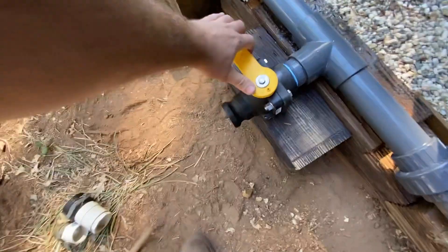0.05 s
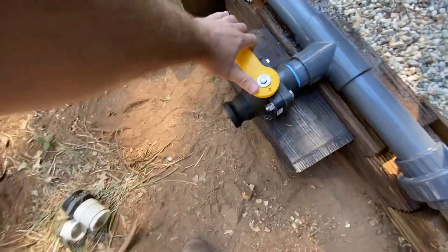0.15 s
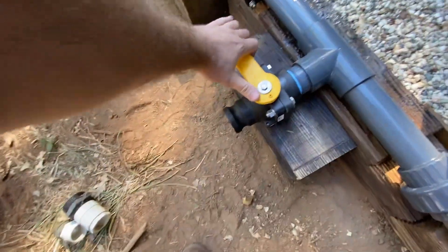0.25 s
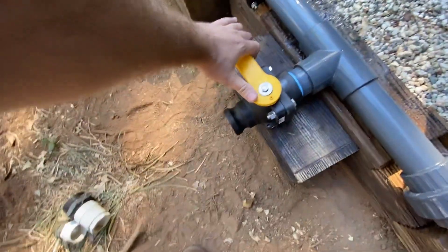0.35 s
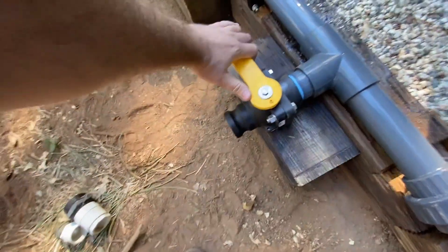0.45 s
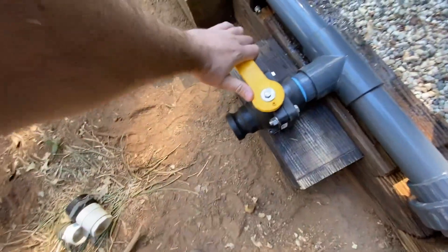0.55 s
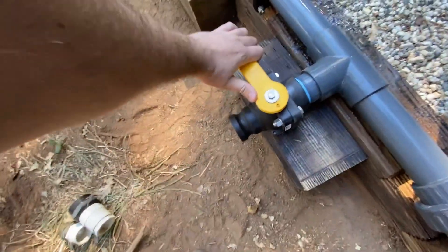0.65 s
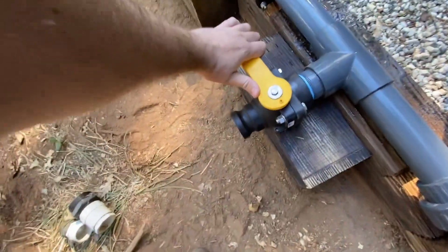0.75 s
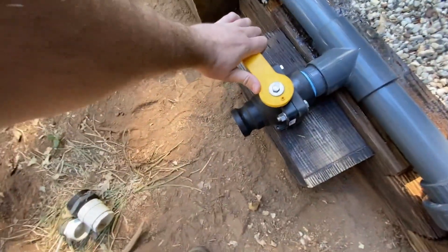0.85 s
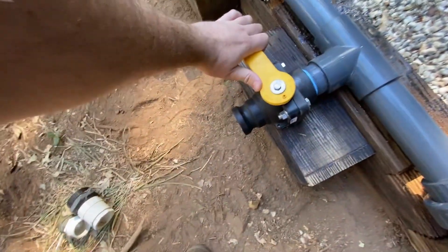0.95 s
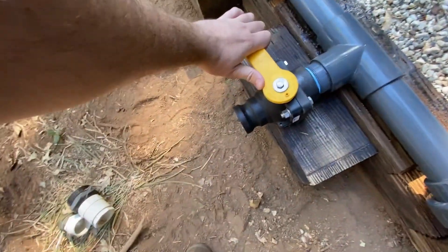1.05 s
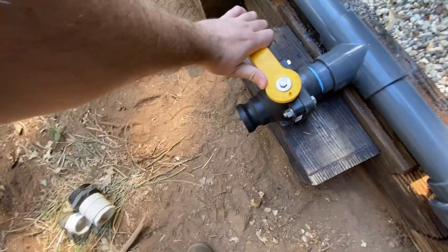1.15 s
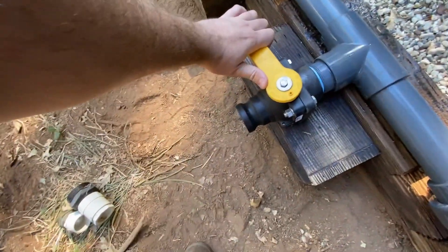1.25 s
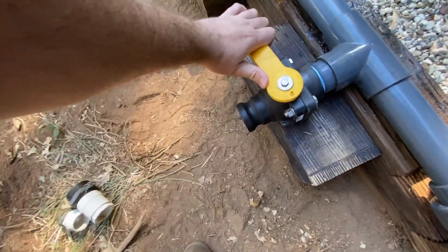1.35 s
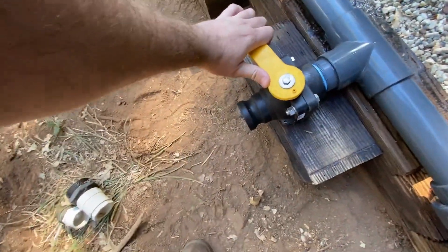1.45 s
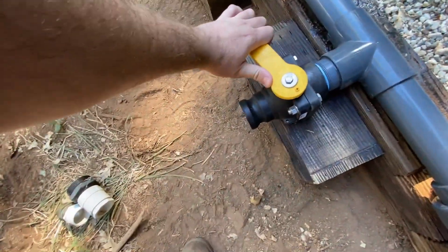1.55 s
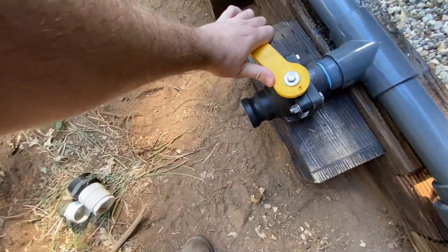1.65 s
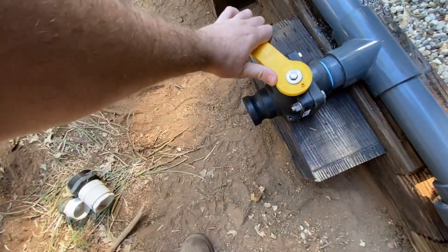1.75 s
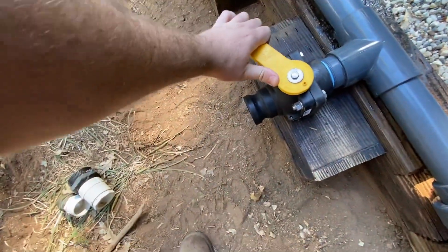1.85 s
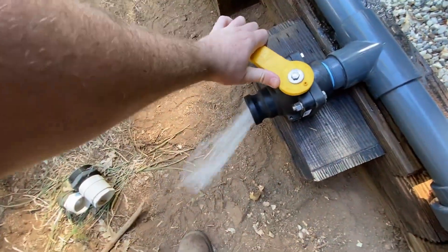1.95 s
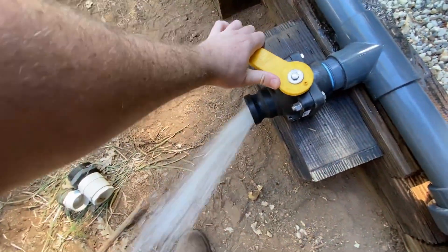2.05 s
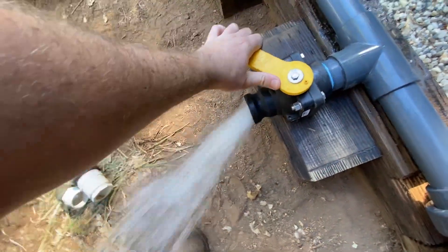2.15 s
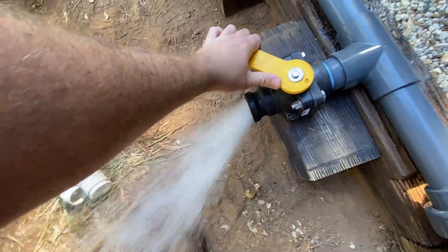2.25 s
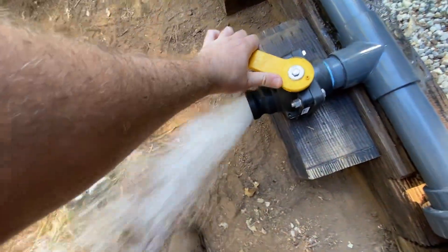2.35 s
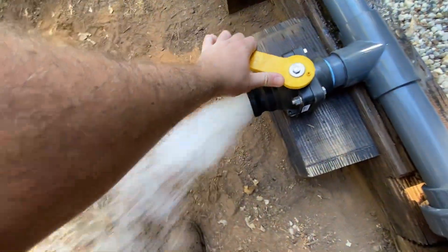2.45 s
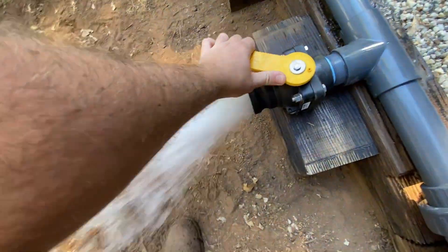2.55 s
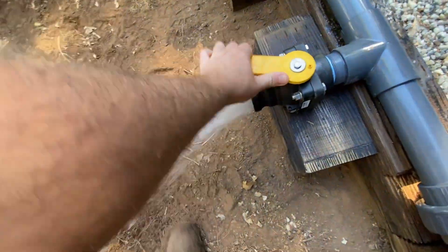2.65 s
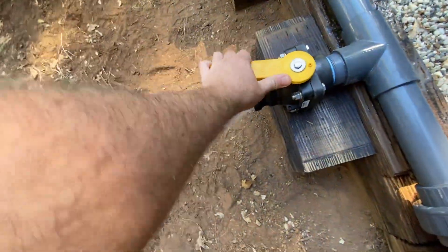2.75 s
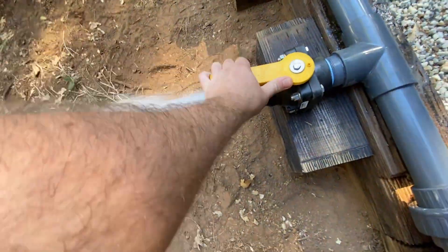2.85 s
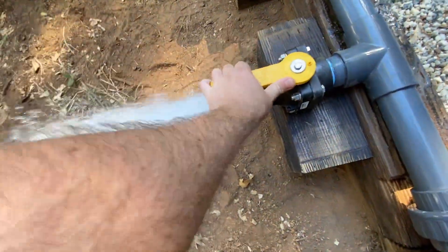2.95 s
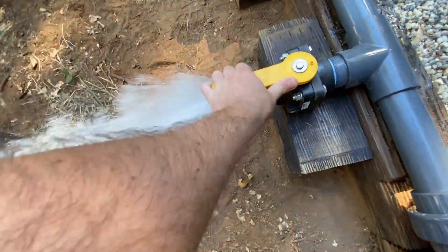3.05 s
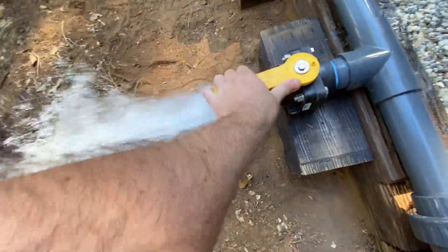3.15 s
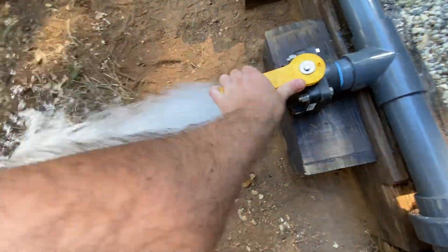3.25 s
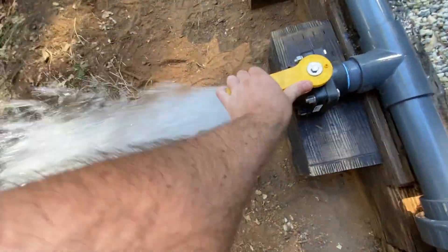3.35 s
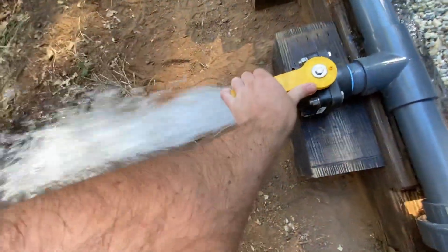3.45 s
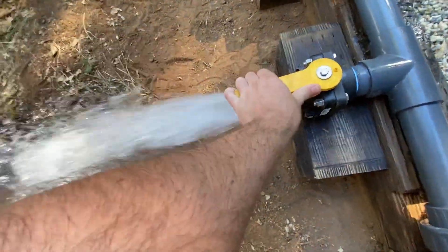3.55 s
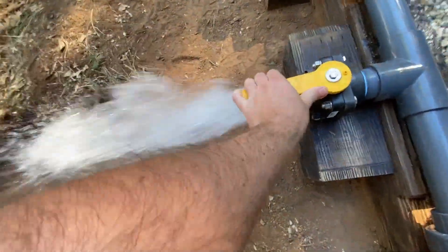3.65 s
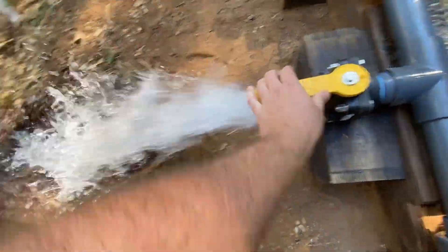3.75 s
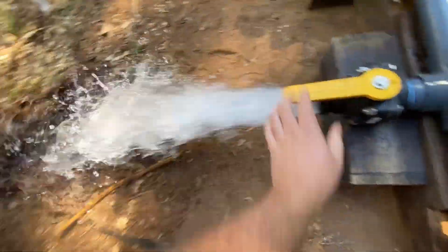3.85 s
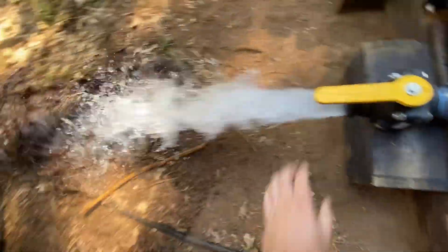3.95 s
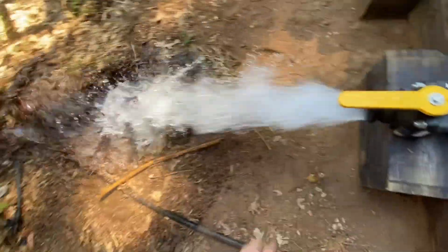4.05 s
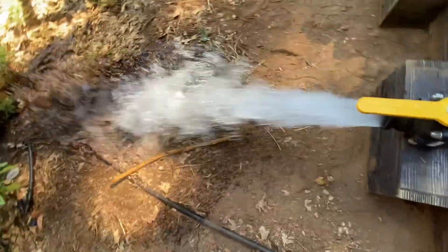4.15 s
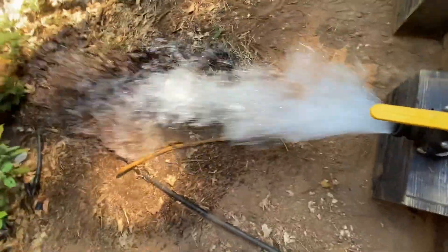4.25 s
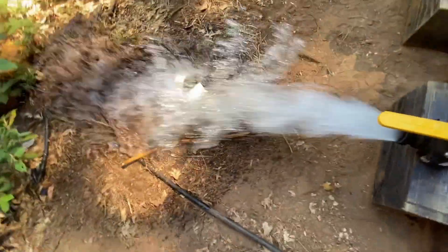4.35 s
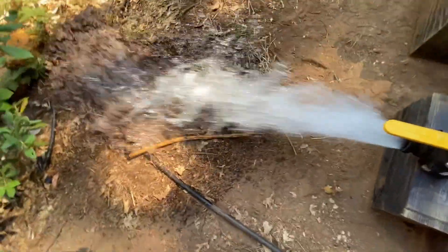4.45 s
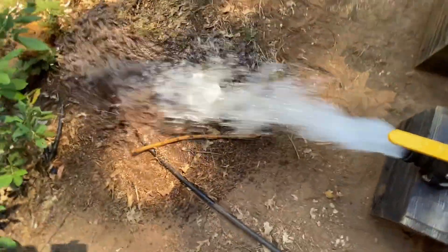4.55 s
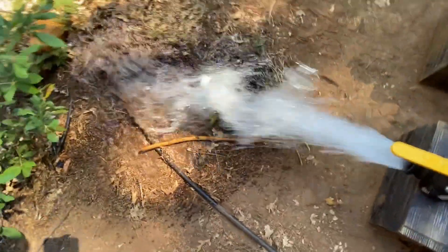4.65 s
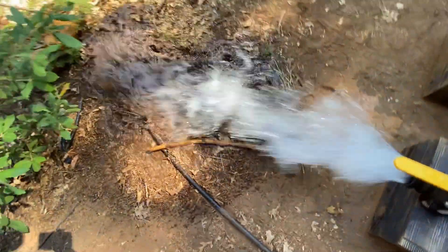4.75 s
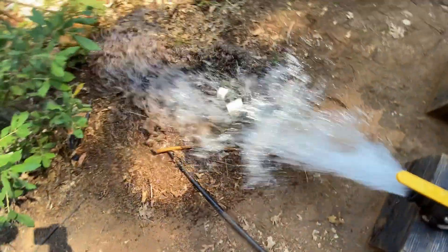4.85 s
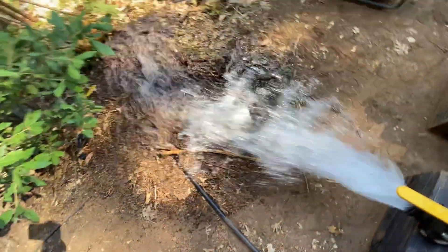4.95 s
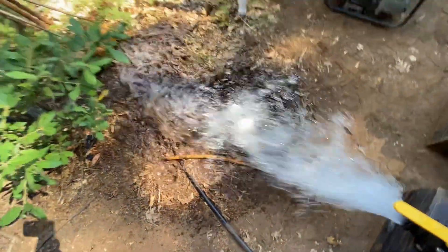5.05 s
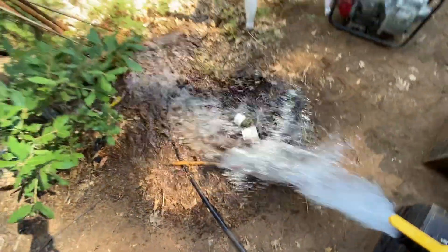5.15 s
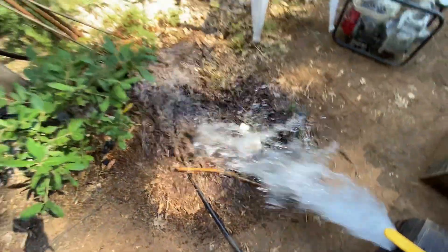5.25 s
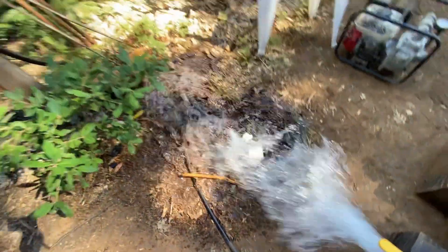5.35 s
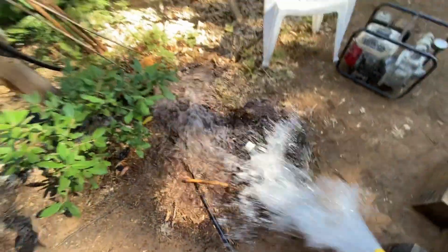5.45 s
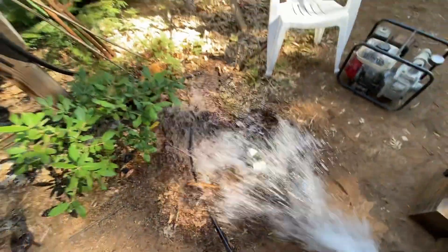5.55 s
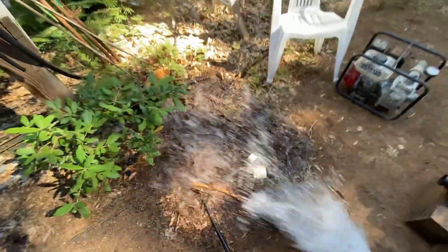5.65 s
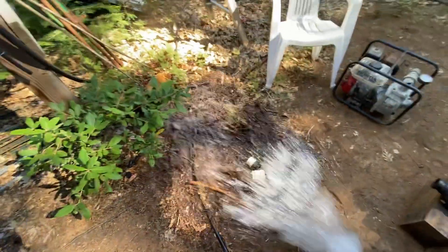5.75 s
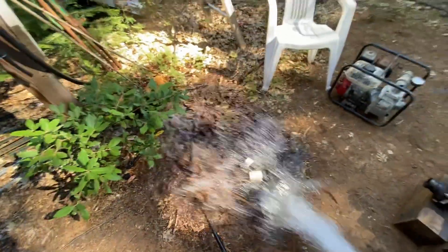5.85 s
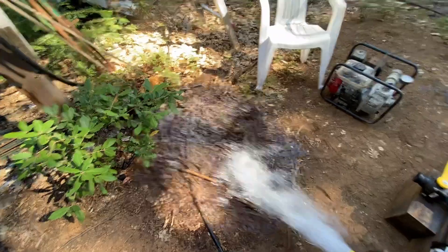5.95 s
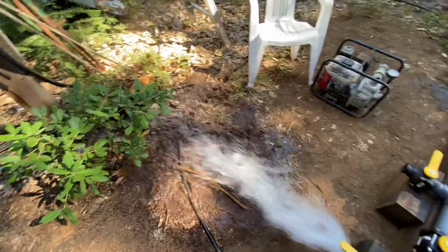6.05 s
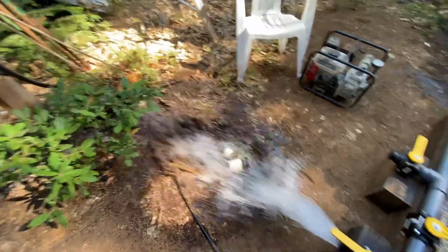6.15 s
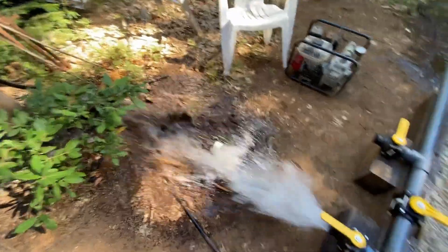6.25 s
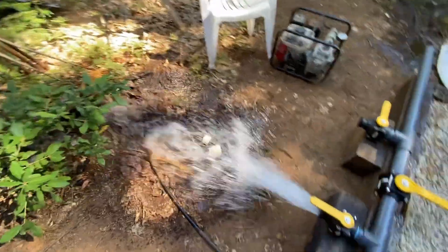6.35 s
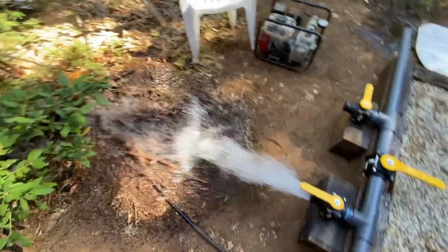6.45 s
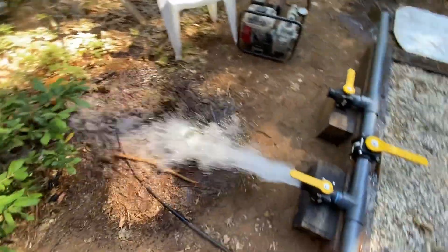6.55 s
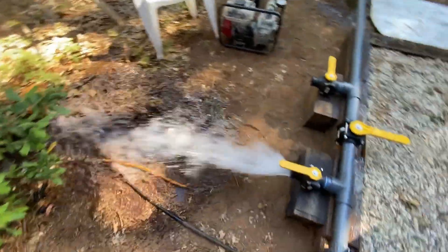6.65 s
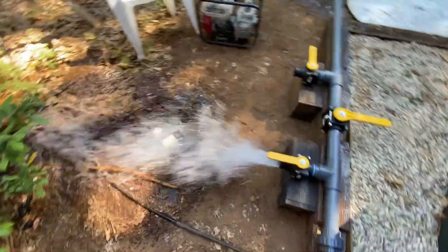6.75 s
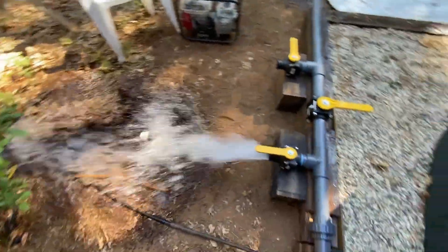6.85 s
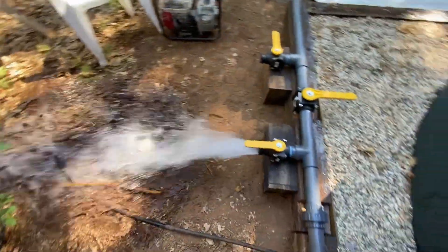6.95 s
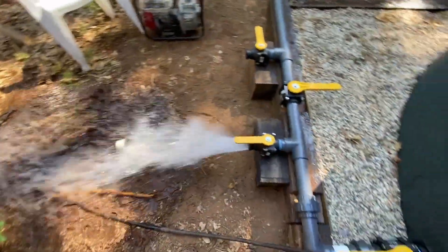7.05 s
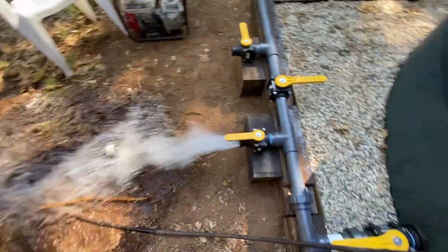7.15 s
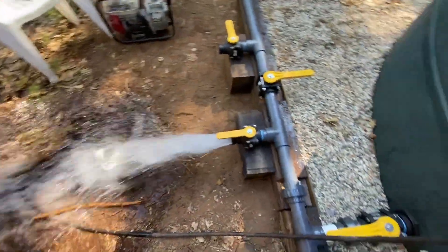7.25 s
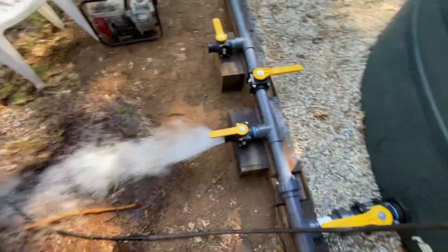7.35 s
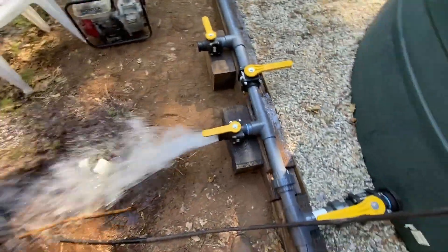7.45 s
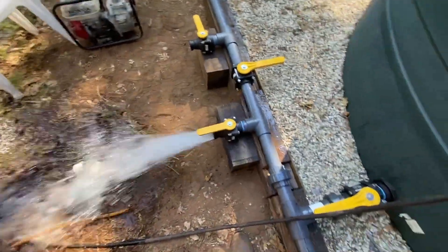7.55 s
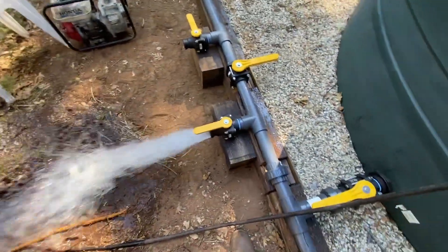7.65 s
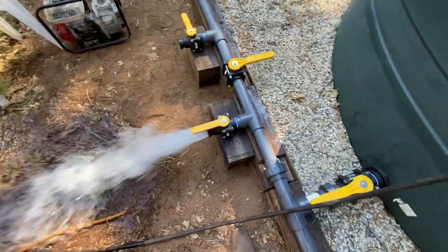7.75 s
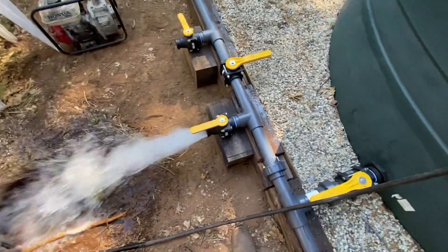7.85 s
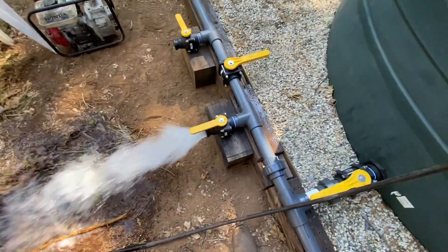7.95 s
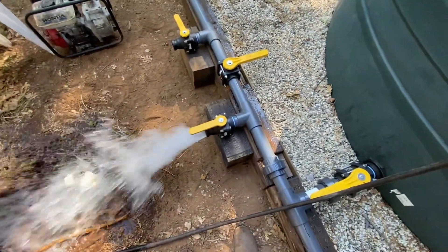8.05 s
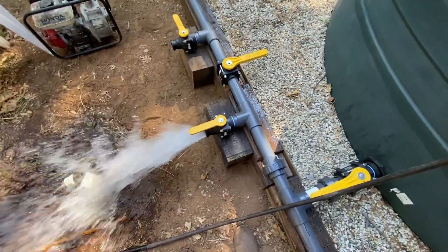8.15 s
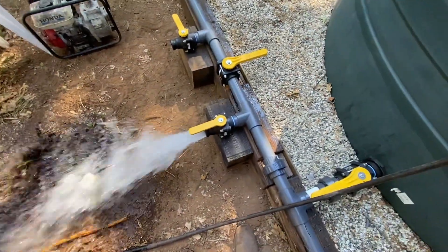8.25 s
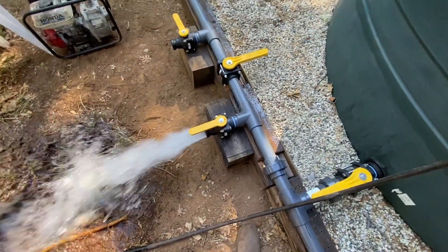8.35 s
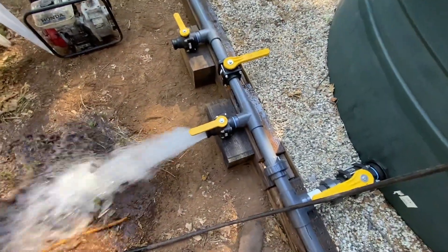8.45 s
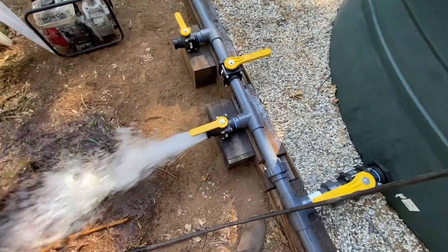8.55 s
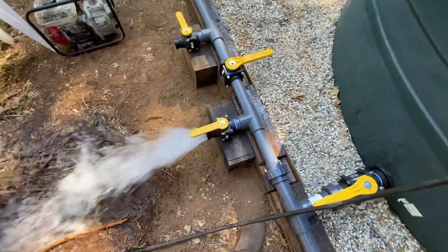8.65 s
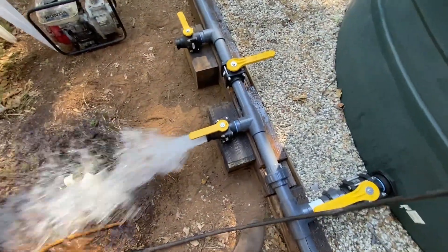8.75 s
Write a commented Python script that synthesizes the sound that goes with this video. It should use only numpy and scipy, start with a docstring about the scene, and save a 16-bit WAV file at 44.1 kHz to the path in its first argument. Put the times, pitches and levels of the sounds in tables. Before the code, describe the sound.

Quiet handling rustle and small ticks, a growing hiss, then hollow gurgling bursts and a loud, steady rush of water splattering on bare ground.

```python
"""Outdoors, close to a hand-held camera: a lever valve on a water pipe is opened.
A knock of shaped noise, rustling rubs of the hand and ringing ticks of the stiff lever come first.
The leaking seal hisses in bands and whistles; low gulps sound and slugs ring the outlet with a falling note.
A thick jet of random drops and bubbles then gushes and splashes on bare dirt while the camera turns."""
import sys
import numpy as np
from scipy import signal
from scipy.fft import rfft, irfft, next_fast_len
from scipy.io import wavfile
from scipy.ndimage import map_coordinates

SR = 44100
rng = np.random.default_rng(int(sys.argv[2]) if len(sys.argv) > 2 else 0)


def to_wav(sig):
    """Store sig (one row per channel, or 1-D mono) as 16-bit WAV at the path in sys.argv[1].

    Samples outside -1..1 are clipped; the rate is SR.
    """
    pcm = np.clip(np.atleast_2d(sig), -1, 1) * 32767
    pcm = np.round(pcm).astype(np.int16)
    wavfile.write(sys.argv[1], SR, pcm.T)  # frames by channels


N = 388080


def amp(db):
    """Decibels to gain."""
    return 10 ** (np.asarray(db) / 20)


def unit(x):
    """Scale to rms 1."""
    return x / np.sqrt(np.mean(x ** 2) + 1e-20)


def along(points, hz):
    """(f/Hz, value) points read on a log frequency axis."""
    f, v = np.transpose(points)
    return np.interp(np.log(hz + 1), np.log(f + 1), v)


def curves(rows):
    """One value per sample for each column after the time."""
    s, *cols = np.transpose(rows)
    return [np.interp(np.arange(N) / SR, s, c) for c in cols]


def wobble(rate_hz):
    """Smooth random curve, rate_hz knots a second."""
    knots = rng.standard_normal(int(N * rate_hz / SR) + 4)
    return map_coordinates(knots, [np.arange(N) * rate_hz / SR])


def noise():
    """Two unrelated white noises."""
    return rng.standard_normal((2, N))


def filtered(x, response):
    """x times a response of frequency."""
    size = next_fast_len(N + 8192, True)
    return irfft(rfft(x, size) * response(np.fft.rfftfreq(size, 1 / SR)), size)[..., :N]


def ringing(x, modes):
    """x through fixed resonances (f/Hz, width/Hz, level/dB)."""
    def response(hz):
        return sum(amp(db) / (1 + 2j * (hz - centre) / width) ** 2 for centre, width, db in modes)
    return filtered(x, response)


# left-right likeness of the water sound: f/Hz, likeness/0-1
LIKENESS = [(60, 0), (200, 0.99), (900, 0.38), (2500, 0.25), (8000, 0.19), (10800, 0.62)]


def spread(pair, tone, alike=LIKENESS):
    """Colours two unrelated signals and mixes them into partly alike left and right; the middle has rms 1."""
    def response(hz):
        turn = np.arccos(np.clip(along(alike, hz), -1, 1)) / 2
        return amp(along(tone, hz)) * np.array([np.cos(turn), np.sin(turn)])
    mid, side = filtered(pair, response)
    return np.array([mid + side, mid - side]) / np.std(mid)


def add(track, s, sound):
    """Mix a short sound into the track at time s."""
    part = track[..., max(round(s * SR), 0):][..., :sound.shape[-1]]
    part += sound[..., :part.shape[-1]]


def ramp(start_s, length_s):
    """0 before the start, rising evenly to 1 over the length."""
    return np.clip((np.arange(N) / SR - start_s) / length_s, 0, 1)


def swell(peak_s, length_s, attack):
    """Rises to 1 at the peak and falls back; attack is the rising share of the length."""
    attack = np.clip(attack, .05, .95)
    rise = ramp(peak_s - attack * length_s, attack * length_s)
    return np.maximum(rise - ramp(peak_s, (1 - attack) * length_s), 0)


def drops(rate_hz, size_db, t60_s):
    """Drops of scattered size strike at random; each is a sudden, quickly dying puff of noise."""
    sizes = amp(size_db * np.minimum(rng.standard_normal((2, N)), 2.7)) ** 2
    strikes = (rng.random((2, N)) < rate_hz / SR) * sizes
    power = signal.lfilter([1], [1, -amp(-120 / (t60_s * SR))], strikes)
    return unit(np.sqrt(power) * noise())


def bubbles(centre_hz, cycles, size_db, glide, count):
    """Trapped bubbles ring for a few cycles, rising in pitch as they near the surface."""
    when, pitch, size, port = rng.random((4, count, 1))
    hz = centre_hz * 4 ** (pitch - .5)
    t = np.arange(SR // 80) / SR
    age = t * hz / cycles
    level = amp(size_db * np.minimum(-np.log(size), 4))
    ring = level * np.exp(-2 * age) * np.sin(2 * np.pi * hz * t * (1 + glide * age))
    index = (when * N).astype(int) + np.arange(len(t)) + N * (port > .5)
    both = np.bincount(index.ravel(), ring.ravel(), minlength=2 * N)
    return unit(both[:2 * N].reshape(2, N))


def pops(rows, t60_s, rise_s, slap_t60_s):
    """Each row (t/s, level/dB, f/Hz, slap/dB re level) gives a hollow ring and a wet slap, kept apart."""
    rings, slaps, t = np.zeros(N), np.zeros((2, N)), np.arange(SR // 12) / SR
    for s, db, hz, slap_db in rows:
        envelope = amp(db - 60 * t / t60_s) * (1 - np.exp(-t / rise_s))
        add(rings, s, envelope * np.sin(2 * np.pi * hz * t))
        add(slaps, s, amp(db + slap_db - 60 * t / slap_t60_s) * rng.standard_normal((2, len(t))))
    return rings, slaps


# bore starts to open; pipe fills; lever reaches fully open
OPEN_S, FILL_S, TURN_S = 1.7924, 0.079, 1.48
FILL_DB = 30.5  # rise of the water sound while the pipe fills


def flow():
    """Gain of the water as the pipe fills, and how narrow the bore still is (1 to 0)."""
    gain = ramp(OPEN_S, FILL_S / 10) * amp(FILL_DB * (ramp(OPEN_S, FILL_S) - 1))
    return gain, 1 - ramp(OPEN_S, TURN_S)


# creaks of the stiff lever as it sticks and slips: t/s, peak level/dB, f/Hz
LEVER_TICKS = [(0.931, -64, 3460), (1.019, -62, 3180), (1.137, -65, 3400), (1.182, -60, 3180),
               (1.312, -60, 703), (1.375, -61, 993), (1.407, -57, 900), (1.561, -53, 1060),
               (1.570, -51, 5770)]
# bumps of the camera in the hand: t/s, level/dB
CAMERA_BUMPS = [(.16, -40), (.45, -49), (1.16, -40), (1.38, -53)]
# rubs of the hand on the lever: peak t/s, length/s, level/dB, handle ring/dB (before halving)
HAND_RUBS = [(0.094, 0.32, -52.5, -17), (0.336, 0.41, -59.5, -0.5), (0.518, 0.19, -68.5, 4),
             (0.667, 0.22, -72, 6)]
# ring of the rubbed handle: f/Hz, width/Hz, level/dB
HANDLE_MODES = [(1780, 470, 0)]
# rustle of the hand: f/Hz, level/dB per Hz
HAND_TONE = [(150, 7.5), (700, 1.5), (2300, -1), (2900, -5.5), (7000, -10.5), (11000, -19), (14000, -60)]
# low handling rumble and draught: f/Hz, level/dB per Hz
LOW_RUMBLE_TONE = [(20, -56), (55, -0.5), (85, 2), (150, -12), (900, -33.5), (6000, -75)]
RUB_ATTACK, GRIP_DB = 0.68, -81.5  # rising share of a rub; steady rustle of the grip
TREMOR_DB, TREMOR_SWING_DB = -71, 3


def lever(t60_s=0.051, tick_width_hz=750, bump_hz=65):
    """The hand rustles and bumps, and the plastic valve creaks in short, rough slips."""
    touches, t = np.zeros(N), np.arange(SR // 8) / SR
    for s, db, hz in LEVER_TICKS:
        slip = amp(-60 * t / t60_s) * rng.standard_normal(len(t)) ** 3
        mode = signal.iirpeak(hz, hz / tick_width_hz, SR)
        creak = signal.lfilter(*mode, signal.lfilter(*mode, slip))
        add(touches, s, amp(db) * creak / np.abs(creak).max())
    for s, db in CAMERA_BUMPS:
        envelope = amp(db - 60 * t / 0.12) * (1 - np.exp(-t / 0.0068))
        add(touches, s, envelope * np.sin(2 * np.pi * bump_hz * t * rng.uniform(0.89, 1.38)))
    rustle = spread(drops(rate_hz=800, size_db=2.2, t60_s=0.02), HAND_TONE)
    handle = unit(ringing(noise(), HANDLE_MODES))
    rubs = 0
    for s, length, db, ring_db in HAND_RUBS:
        pressure = swell(s, length, RUB_ATTACK) ** 1.26
        rubs = rubs + amp(db) * pressure * (rustle + amp(ring_db) * handle / 2)
    grip = amp(GRIP_DB + 2.3 * wobble(14)) * rustle
    tremor = amp(TREMOR_DB + TREMOR_SWING_DB * wobble(22)) * spread(noise(), LOW_RUMBLE_TONE)
    return touches + rubs + grip + tremor


# puffs of air on the ports: peak t/s, length/s, swell/dB
AIR_PUFFS = [(1.945, 0.15, 18), (3.7, 0.97, 4), (6.797, 0.23, 9)]
# still air of the yard: f/Hz, level/dB per Hz
YARD_TONE = [(70, -2.5), (200, -16), (9000, -33), (14000, -60)]
# distance of the camera from the splash, a little nearer, then further: t/s, distance/m
SPLASH_DISTANCE_M = [(1.8, 1.11), (3.4, 0.94), (4.6, 0.98), (6.0, 1.254), (8.8, 1.35)]
YARD_DB = -74.5
BUFFET_DB, NARROW_BUFFET_DB = -50.5, 9  # at 1 m, valve wide open; reduction at a narrow bore


def air():
    """A quiet yard; once the jet runs, its draught buffets each port separately."""
    flowing, narrow = flow()
    puff_db = sum(db * swell(s, length, attack=0.58) for s, length, db in AIR_PUFFS)
    buffet_db = BUFFET_DB - NARROW_BUFFET_DB * narrow + puff_db + 1.7 * wobble(14)
    draught = flowing * amp(buffet_db) / curves(SPLASH_DISTANCE_M)[0]
    yard = amp(YARD_DB) * spread(noise(), YARD_TONE)
    return draught * spread(noise(), LOW_RUMBLE_TONE, [(60, 0.055)]) + yard


def blow(start_s, level_db, rise_s, t60_s, tone):
    """A burst of coloured noise that swells and dies."""
    t = np.maximum(np.arange(N) / SR - start_s, 0)
    return amp(level_db - 60 * t / t60_s) * (1 - np.exp(-t / rise_s)) * spread(noise(), tone)


# hard clack: f/Hz, level/dB per Hz
HARD_CLACK_TONE = [(300, -5), (3000, 0), (4900, 4.5), (6000, -8), (11500, -28), (13500, -60)]
# dull thump: f/Hz, level/dB per Hz
DULL_THUMP_TONE = [(40, -10), (150, 0), (270, -1), (500, -10), (4500, -24), (11000, -43), (13500, -70)]


def knock():
    """A hard, bright clack, then a dull thump of slower onset and decay."""
    clack = blow(start_s=.0202, level_db=-28, rise_s=.0003, t60_s=.06, tone=HARD_CLACK_TONE)
    thump = blow(start_s=.024, level_db=-25.5, rise_s=.014, t60_s=.2, tone=DULL_THUMP_TONE)
    return clack + thump


# hiss bands of the leak: f/Hz, width/Hz, level/dB
LEAK_MODES = [(800, 1200, 2), (2500, 810, 4.5), (4420, 1100, 3), (6500, 1500, 0), (9800, 1900, 0.5)]
# whistles of the widening gap: peak t/s, length/s, level/dB, f/Hz at the peak
GAP_WHISTLES = [(1.75, .2, -63, 2200), (1.765, .2, -60, 1340)]
LEAK_S, LEAK_DB, LEAK_GROWTH_DB, LEAK_RELEASE_S = 1.506, -54, 20, 0.085
WHISTLE_SAG_PER_S, WHISTLE_WAVER = .4, .035  # shares of the pitch


def seal():
    """Water squeezes past the seal with a growing hiss and thin, wavering whistles."""
    growth_db = LEAK_GROWTH_DB * (ramp(LEAK_S, OPEN_S - LEAK_S) - 1)
    level = amp(LEAK_DB + growth_db) * (ramp(LEAK_S, 0.09) - ramp(OPEN_S, LEAK_RELEASE_S))
    sound = level * unit(ringing(drops(rate_hz=1700, size_db=4.0, t60_s=0.0098), LEAK_MODES))
    for s, length, db, hz in GAP_WHISTLES:
        sag = WHISTLE_SAG_PER_S * (np.arange(N) / SR - s)
        pitch_hz = hz * (1 - sag + WHISTLE_WAVER * wobble(250))
        envelope = amp(db + 4.7 * wobble(120)) * swell(s, length, attack=0.44)
        sound = sound + envelope * np.sin(2 * np.pi * np.cumsum(pitch_hz) / SR)
    return sound


# churn, and the jet's thud on firm soil: f/Hz, level/dB per Hz
FIRM_SOIL_TONE = [(30, -34), (100, -1.5), (300, 1), (430, -6.5), (700, 0), (4000, -42)]
# narrow-band gurgles of the jet: peak t/s, length/s, level/dB, f/Hz
JET_GURGLES = [(2.798, 0.55, -35, 1440), (5.1, 1.7, -41.5, 2010), (6.3, 1.6, -37, 1390),
               (6.64, 1, -35, 1760), (7.6, 6.3, -41.5, 1017)]
CHURN_S, CHURN_LENGTH_S, CHURN_DB = 1.837, 0.2, -36
GURGLE_WIDTH_HZ = 190


def hollows():
    """Air and water churn in the pipe as it clears; later the jet gurgles in narrow bands, each at its note."""
    churning = spread(drops(rate_hz=370, size_db=5.5, t60_s=0.018), FIRM_SOIL_TONE)
    sound = amp(CHURN_DB) * swell(CHURN_S, CHURN_LENGTH_S, attack=0.3) * churning
    stirring = drops(rate_hz=500, size_db=4.5, t60_s=0.0059)
    for s, length, db, hz in JET_GURGLES:
        gurgle = unit(ringing(stirring, [(hz, GURGLE_WIDTH_HZ, 0)]))
        sound = sound + amp(db) * swell(s, length, attack=0.49) * gurgle
    return sound


def outlet(drive, hz, width_hz):
    """An air pocket, shaken by the drive, rings at a note that may move."""
    carrier = np.exp(2j * np.pi * np.cumsum(hz * np.ones(N)) / SR)
    ring = signal.lfilter([1], [1, -np.exp(-np.pi * width_hz / SR)], drive / carrier)
    return (ring * carrier).real


def patches(pair, depth_db, width_hz, life_s):
    """Narrow bands swell and fade at random, each on its own."""
    hz, t, z = signal.stft(pair, SR, nperseg=512)
    grid = np.meshgrid(hz / width_hz, t / life_s, indexing="ij")
    field = map_coordinates(rng.standard_normal((256, 512)), grid, mode="mirror")
    return signal.istft(z * amp(depth_db * field), nperseg=512)[1][:, :N]


# hollow note of the outlet as the bore opens: t/s, f/Hz
BORE_NOTE_HZ = [(1.87, 1350), (1.905, 970), (1.955, 970), (2.015, 758), (2.6, 726), (3.4, 866), (4.2, 705),
                (8.5, 708)]
# fixed upper rings of the short nozzle: f/Hz, width/Hz, level/dB
NOZZLE_MODES = [(1380, 300, 10), (2250, 450, 8.5), (3200, 800, 4)]
# strength of the hollow note, faintest while the camera looks away: t/s, level/dB
OUTLET_LEVEL_DB = [(2.1, 2.5), (2.65, -4), (3.0, -5), (3.3, 5.5), (3.8, 3.5), (4.75, -4), (5.85, -11),
                   (7.2, -0.5), (8.7, 0)]
# first spurt and later surges of the jet: peak t/s, length/s, swell/dB
JET_SURGES = [(1.852, 0.33, 19.5), (2.483, 0.26, 14), (3.74, 0.074, 6.5), (4.67, 0.42, 6.5),
              (5.335, 0.45, 6.5), (8.044, 0.038, 14.5)]
# thud on flooded mud: f/Hz, level/dB per Hz
FLOODED_MUD_TONE = [(40, -9.5), (190, -10), (380, -0.5), (700, -3), (4000, -63)]
# splash in the puddle: f/Hz, level/dB per Hz
PUDDLE_TONE = [(200, -33.5), (850, -8.5), (1500, -2), (3500, -5.5), (12000, -42)]
# fine spray: f/Hz, level/dB per Hz
MIST_TONE = [(700, -13), (3500, -3), (5000, 1.5), (6600, -3.5), (8000, -9), (10300, -10.5), (11600, -14.5),
             (13000, -34)]
# valve wide open; splash and spray at 1 m
GARGLE_DB, THUD_DB, SPLASH_DB, SPRAY_DB = -38, -44.5, -31.5, -31
NARROW_SPLASH_DB, NARROW_SPRAY_DB = 11.5, 4.5  # reduction at a narrow bore
NOZZLE_DB = -13  # re the hollow note, at a narrow bore
BORE_WIDTH_HZ, BORE_WAVER = 150, .06  # waver: share of the note
SURGE_ATTACK = .33  # rising share of a surge
THUD_SHARE, SPLASH_SHARE, SPRAY_SHARE = 0.38, 0.31, 0.16  # dB taken per dB of swell
GARGLE_LUMP_DB, SPLASH_LUMP_DB = 2, 0.97  # swing with the lumps of water
PUDDLE_S, PUDDLE_FILL_S = 2.15, 0.22
SPLASH_PATCH_DB, SPLASH_PATCH_HZ, SPLASH_PATCH_S = 2.7, 150, .06
# the forearm passes between spray and camera
ARM_FROM_S, ARM_TO_S, ARM_MOVE_S, ARM_SHADE_DB = 2.56, 3.88, 0.14, 4.5


def jet():
    """The ragged jet gargles in the outlet, thuds on the soil, splashes in its puddle and throws fine spray."""
    flowing, narrow = flow()
    surge_db = sum(db * swell(s, length, SURGE_ATTACK) for s, length, db in JET_SURGES)
    outlet_db = curves(OUTLET_LEVEL_DB)[0] + surge_db
    behind_arm = ramp(ARM_FROM_S, ARM_MOVE_S) - ramp(ARM_TO_S - ARM_MOVE_S, ARM_MOVE_S)
    splash_db = SPLASH_DB - NARROW_SPLASH_DB * narrow + SPLASH_SHARE * surge_db
    spray_db = SPRAY_DB - NARROW_SPRAY_DB * narrow + SPRAY_SHARE * surge_db - ARM_SHADE_DB * behind_arm
    lumps = 0.59 * wobble(11) + wobble(50) + .5 * wobble(170)  # uneven masses of water drive every layer

    flooded = ramp(5.7, 0.79)  # standing water gathers and raises the thud's pitch
    thuds = drops(rate_hz=700, size_db=0.5, t60_s=0.012)
    soil = (1 - flooded) * spread(thuds, FIRM_SOIL_TONE) + flooded * spread(thuds, FLOODED_MUD_TONE)

    shaking = drops(rate_hz=1400, size_db=4.0, t60_s=0.0067)
    note_hz = curves(BORE_NOTE_HZ)[0] * (1 + BORE_WAVER * wobble(40))
    pocket = outlet(shaking, note_hz, BORE_WIDTH_HZ)
    gargle = spread(pocket, [(200, -5), (650, 4.5), (1500, 0.5), (4000, -33)], [(700, 0.8)])
    gargle = gargle + amp(NOZZLE_DB) * narrow * unit(ringing(shaking, NOZZLE_MODES))

    fizz = bubbles(centre_hz=1599, cycles=13.6, size_db=2.5, glide=0.085, count=3000)
    puddle = drops(rate_hz=3000, size_db=-1.0, t60_s=0.0083) + amp(-12.0) * fizz
    patchy = patches(puddle, SPLASH_PATCH_DB, SPLASH_PATCH_HZ, SPLASH_PATCH_S)
    splash = ramp(PUDDLE_S, PUDDLE_FILL_S) * spread(patchy, PUDDLE_TONE)
    mist = drops(rate_hz=2000, size_db=4.0, t60_s=0.012) + noise()
    spray = spread(mist, MIST_TONE)

    landing = amp(splash_db + SPLASH_LUMP_DB * lumps) * splash + amp(spray_db + lumps) * spray
    landing = landing / curves(SPLASH_DISTANCE_M)[0]
    thud = amp(THUD_DB + THUD_SHARE * outlet_db + 2.0 * lumps) * soil
    gargling = amp(GARGLE_DB + outlet_db + GARGLE_LUMP_DB * lumps + wobble(25)) * gargle
    return flowing * (thud + gargling + landing)


# low gulps as the valve opens, later low thuds of the jet: t/s, level/dB, f/Hz
GULPS_AND_THUDS = [(1.795, -28, 258), (1.824, -21, 200), (3.171, -24, 312), (6.296, -29, 328),
                   (7.051, -27, 460), (8.043, -26, 385)]
# slugs of water and air ringing the outlet at its note: t/s, level/dB, slap/dB re level
OUTLET_SLUGS = [(1.866, -8.5, -14), (1.901, -6, -16), (1.921, -4.5, -9.5), (1.934, -14, -1),
                (1.948, -11, -7), (1.964, -10, -14), (1.976, -9, -6), (2.011, -12, -6), (2.026, -13, -5),
                (2.04, -10, -7), (2.125, -13, -7.5), (2.489, -20.5, 7.5), (2.606, -15.5, -6),
                (3.736, -13, -15), (7.455, -15, -6), (8.044, -16, -8)]
# lumps of water smacking the mud: t/s, level/dB, f/Hz
MUD_SPLATS = [(2.749, -22, 1590), (2.785, -15, 840), (2.848, -16.5, 1430), (2.996, -19, 1340),
              (3.125, -15, 1400), (3.238, -15.5, 1650), (3.412, -19, 1410), (3.625, -12.5, 1300),
              (4.124, -15.5, 790), (4.178, -11.5, 2370), (4.614, -17, 1930), (4.69, -15, 1860),
              (4.818, -16, 1860), (5, -17, 1120), (5.513, -20, 1480), (6.22, -16.5, 1790),
              (6.666, -16.5, 1270), (7.917, -13, 1840)]
# slap of the splats: f/Hz, level/dB per Hz
MUD_SLAP_TONE = [(200, -14), (800, -2.5), (2400, 3.5), (4500, -15), (11000, -12), (13000, -45)]
GULP_SLAP_DB, SPLAT_SLAP_DB = -16, -4  # re the ring


def slugs():
    """Low gulps and later thuds, slugs that ring the outlet and the nozzle, and splats on the ground."""
    gulp_rows = [(*row, GULP_SLAP_DB) for row in GULPS_AND_THUDS]
    slug_rows = [(s, db, np.interp(s, *np.transpose(BORE_NOTE_HZ)), slap_db)
                 for s, db, slap_db in OUTLET_SLUGS]
    splat_rows = [(*row, SPLAT_SLAP_DB) for row in MUD_SPLATS]
    gulps, gulp_slaps = pops(gulp_rows, t60_s=0.045, rise_s=0.0008, slap_t60_s=0.04)
    bursts, spurts = pops(slug_rows, t60_s=0.026, rise_s=0.00069, slap_t60_s=0.054)
    splats, slaps = pops(splat_rows, t60_s=0.031, rise_s=0.001, slap_t60_s=0.07)
    nozzle = ringing(gulp_slaps + spurts, NOZZLE_MODES)
    smacks = filtered(slaps, lambda hz: amp(along(MUD_SLAP_TONE, hz)))
    return gulps + bursts + splats + nozzle + smacks


# where the jet lies as the camera turns: t/s, bearing/degrees left
JET_BEARING_DEG = [(1.8, 10.7), (2.7, 18.5), (3.6, 31), (4.4, 21.2), (5.8, 5.1), (7.2, 34.7), (8.8, 40.5)]
PORT_SPACING_M = .14
PAN_DB, PAN_OFFSET_DB = 8, -4  # left re right: gain from straight ahead to far left; value straight ahead


def facing(water, shade_hz=5200):
    """The further left the jet, the louder its left port and the later its lower part reaches the right."""
    leftward = np.sin(np.radians(curves(JET_BEARING_DEG)[0]))
    low = filtered(water[1], lambda hz: 1 / (1 + (hz / shade_hz) ** 16))
    delay_samples = leftward * PORT_SPACING_M / 343 * SR  # sound travels at 343 m/s
    late = map_coordinates(low, [np.arange(N) - delay_samples], order=3)
    pan_db = PAN_OFFSET_DB + PAN_DB * leftward
    return np.array([water[0], water[1] - low + late]) * amp(np.array([pan_db, -pan_db]) / 2)


def scene():
    """All sources at the two ports; the jet, hollows, slugs and splats follow the bearing."""
    return facing(jet() + hollows() + slugs()) + knock() + lever() + seal() + air()


# narrow dips in the microphone ports: f/Hz, width/Hz, level/dB
PORT_NOTCHES = [(5410, 360, -8.5), (6064, 290, -13.5), (7560, 300, -9)]
# unequal colour of the ports: f/Hz, left re right/dB
PORT_COLOUR_DB = [(550, 0), (870, 2), (1300, 0.5), (2200, -1.5), (4000, 3), (5500, 2.5), (7000, -0.5)]
# phase lead of the left port, from the delay around the camera's body: f/Hz, lead/rad
LEFT_LEAD_RAD = [(450, 0.14), (900, 1), (1400, 0.084)]
TOP_HZ = 15800


def record(dry):
    """The ports colour and delay each side; nothing is kept above the band limit."""
    def response(hz):
        dips_db = sum(db * np.exp(-(2 * (hz - centre) / width) ** 2) for centre, width, db in PORT_NOTCHES)
        sides = np.array([[.5], [-.5]])
        colour = amp(dips_db + sides * along(PORT_COLOUR_DB, hz))
        return colour * np.exp(1j * sides * along(LEFT_LEAD_RAD, hz)) * (hz < TOP_HZ)
    return filtered(dry, response)


dry = scene()
out = record(dry)
to_wav(out)
```